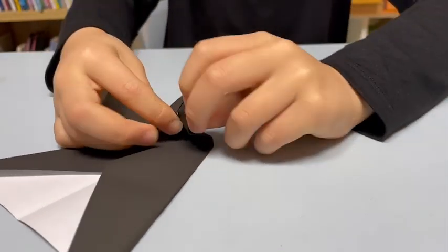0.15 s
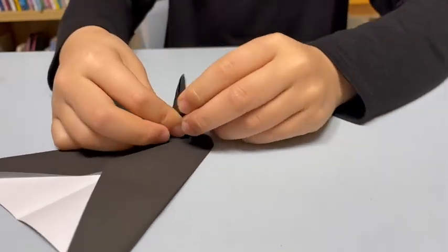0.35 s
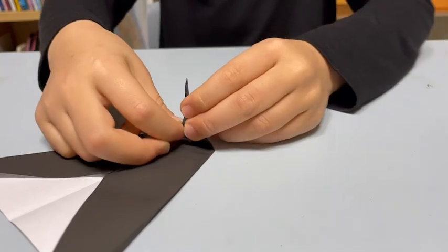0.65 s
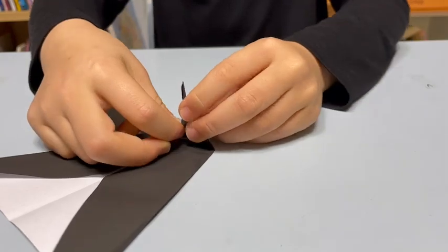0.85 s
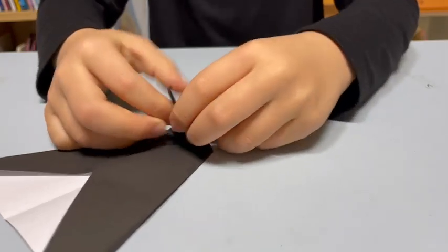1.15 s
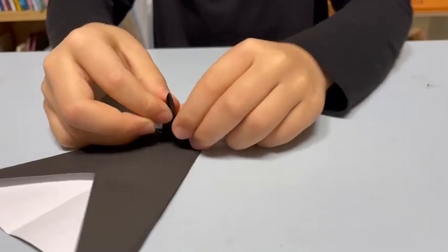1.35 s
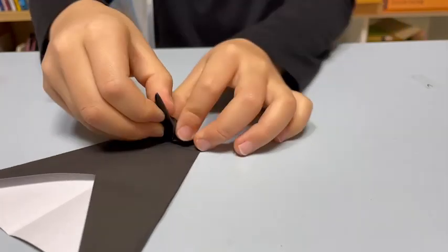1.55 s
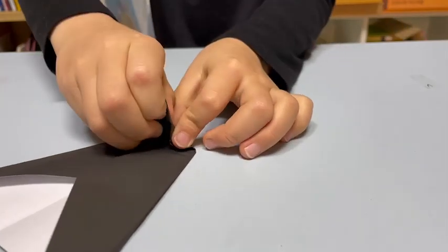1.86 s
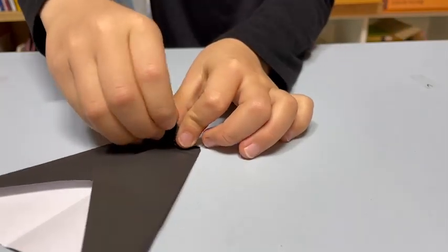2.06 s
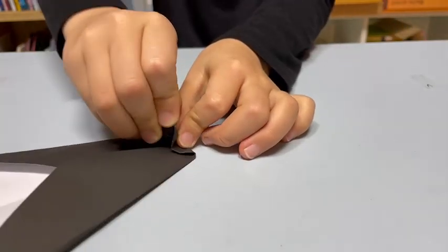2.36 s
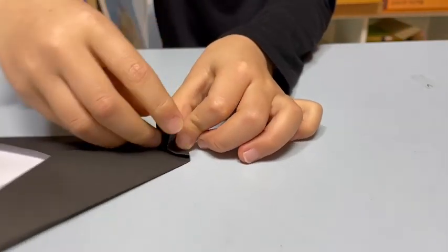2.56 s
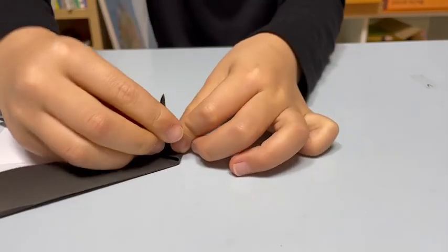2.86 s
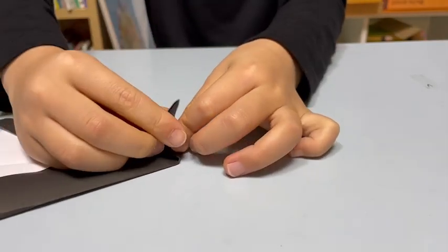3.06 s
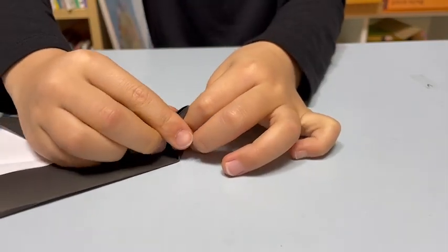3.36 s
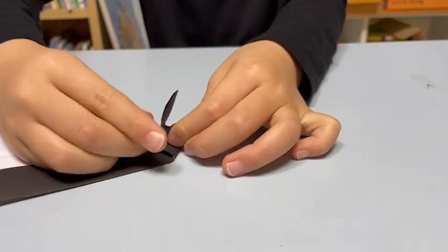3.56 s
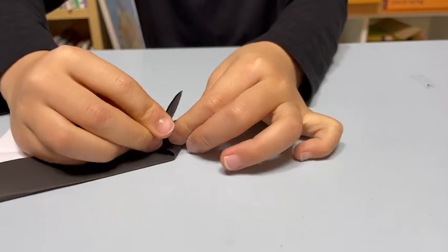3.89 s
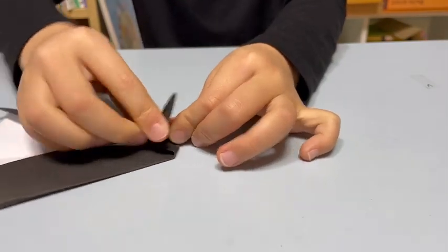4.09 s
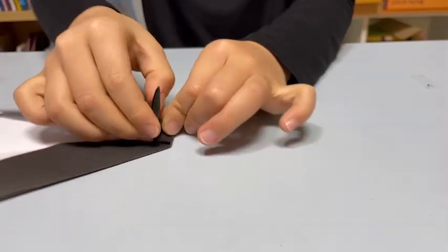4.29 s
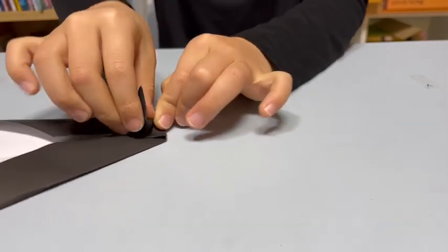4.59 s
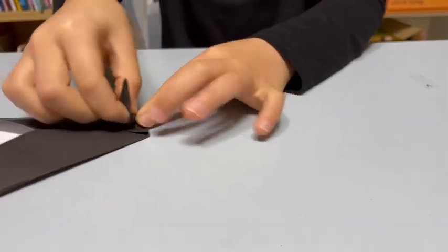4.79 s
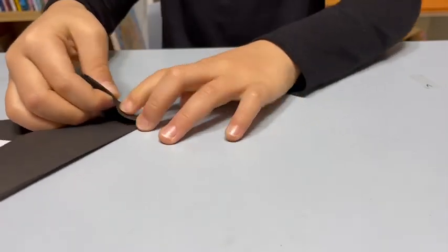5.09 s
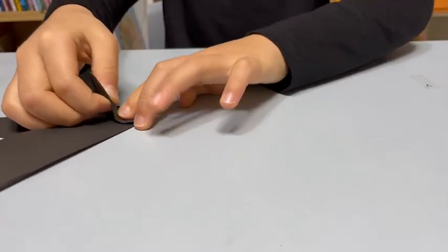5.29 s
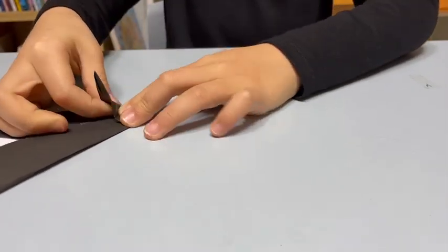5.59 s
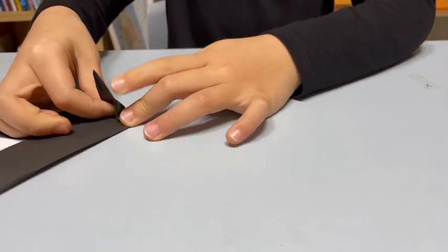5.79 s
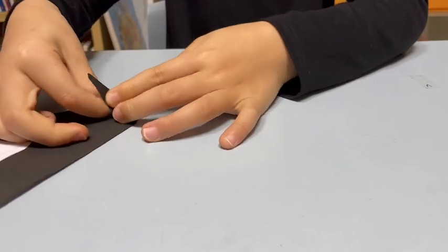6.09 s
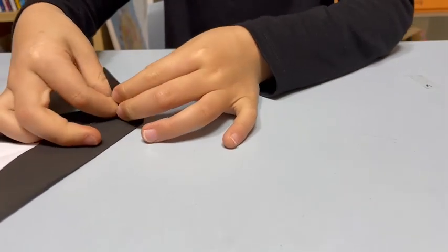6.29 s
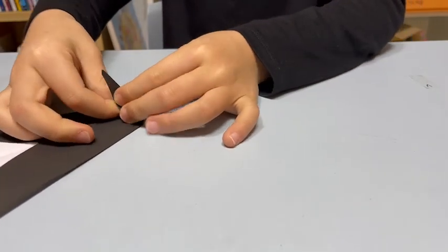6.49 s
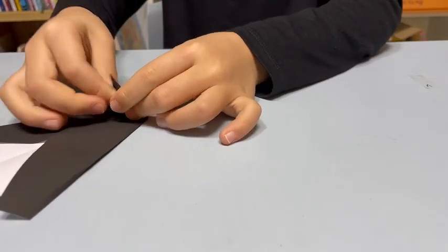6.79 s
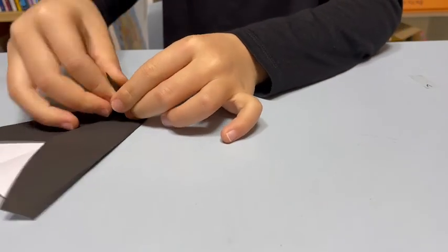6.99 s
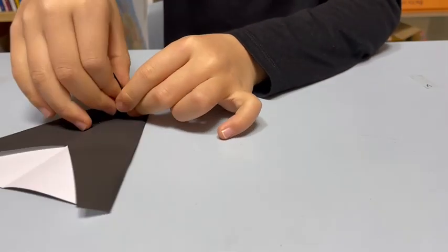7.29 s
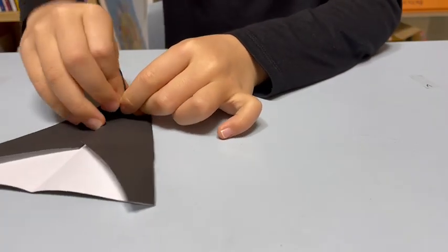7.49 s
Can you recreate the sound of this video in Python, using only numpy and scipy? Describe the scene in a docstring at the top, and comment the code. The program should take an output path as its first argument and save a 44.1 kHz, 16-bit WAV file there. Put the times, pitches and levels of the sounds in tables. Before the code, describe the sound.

Fingers fold and pinch stiff paper at close range, with dry snaps, tiny ticks and fine grainy rubbing in a quiet small room.

```python
"""Small room, at a table: fingers fold and pinch the tip of a stiff paper figure, close to a pair of microphone ports.
The paper buckles in short dry snaps and tick runs: an impulse and decaying noise, coloured facet by facet.
Skin and layers rub with a fine grainy hiss: noise roughened by tiny random slips, shaped by each stroke.
Hands pat the sheet and table (soft bands of noise) and slide with a breathy scrape (noise in a gliding resonance).
Sparse close echoes and a short tail follow, over a quiet low rumble and a faint wavering hum."""
import sys
import numpy as np
from scipy import signal
from scipy.fft import rfft, irfft
from scipy.io import wavfile
from scipy.ndimage import uniform_filter1d

SR = 44100
rng = np.random.default_rng(int(sys.argv[2]) if len(sys.argv) > 2 else 0)


def wrap_up_sound(samples):
    """Save the sound to the file named by the first command line argument, as 16-bit audio."""
    columns = np.atleast_2d(samples).T
    # keep every value between -1 and 1, then stretch to whole-number steps
    tamed = np.clip(columns, -1, 1)
    steps = np.round(tamed * 32767).astype(np.int16)
    wavfile.write(sys.argv[1], SR, steps)


N = 337365
TIME_S = np.arange(N) / SR

# Room noise, spectrum shape: pitch_hz, relative_level_db
ROOM_SPECTRUM = [(20, -17.5), (45, -2.5), (72, 4), (110, -4), (170, -6), (220, -3), (300, -9), (500, -11.5),
                 (900, -27), (1600, -23), (2400, -23), (7500, -42.5), (15500, -37)]
# Finger strokes along the paper: start_s, length_s, relative_friction_db, hiss_over_sheet_db
STROKES = [(0, 0.055, -52.5, -18), (0.379, 0.21, -58.5, 5.5), (0.884, 0.051, -60, 9),
           (0.949, 0.056, -61.5, 6.5), (1.08, 0.065, -60.5, 5.5), (1.148, 0.12, -53.5, 4.5),
           (1.321, 0.14, -53.5, 1), (1.468, 0.22, -60, 4), (1.78, 0.026, -52, -3), (1.916, 0.07, -58, 8),
           (2.208, 0.063, -47, 7.5), (2.475, 0.12, -51, 5), (2.591, 0.12, -52.5, 5.5),
           (2.89, 0.026, -59, -13), (2.962, 0.047, -62, 6), (3.156, 0.12, -59, 4.5),
           (3.375, 0.074, -63.5, 5), (3.455, 0.15, -55, 1.5), (4.055, 0.078, -58.5, 5),
           (4.142, 0.1, -54, 2), (4.25, 0.079, -54.5, 7), (4.38, 0.14, -57, 4), (4.512, 0.059, -57.5, 11.5),
           (4.625, 0.071, -64, 10.5), (4.706, 0.38, -59, 4), (5.047, 0.14, -54, 0.5),
           (5.296, 0.088, -59, 2), (5.448, .08, -50, 4.5), (5.536, 0.11, -58, -16), (5.708, 0.016, -46, 8),
           (5.847, 0.32, -59.5, 1.5), (6.129, 0.089, -56.5, 5), (6.205, 0.1, -67, 1),
           (6.333, 0.046, -67.5, 8.5), (6.456, 0.45, -66.5, 10), (6.625, 0.072, -53, 1),
           (6.78, 0.083, -59, 2), (6.89, 0.037, -73, 16.5), (7, 0.1, -70, 15.5), (7.12, 0.076, -65, 8),
           (7.213, 0.072, -65.5, 7.5), (7.346, 0.21, -56, 0.5)]
ATTACK_S, RELEASE_S, ARCH_DB = 0.016, 0.011, 4  # a stroke sets in, is fastest halfway, and dies away
HISS_GROWTH = 1.11  # exponent: hiss grows faster with speed than the sheet's body does
# Held paper creeping under the fingertips between strokes: time_s, relative_friction_db
CREEP = [(0, -62.5), (.6, -66), (.8, -72), (1.05, -78), (1.5, -67), (1.9, -63), (2.15, -69), (2.7, -61.5),
         (2.87, -75), (3.08, -66), (3.35, -69.5), (3.62, -62.5), (3.75, -75), (4.0, -64), (4.75, -64.5),
         (5.7, -76.5), (6.7, -72.5), (7.6, -67)]
CREEP_BRIGHT_DB = 1  # hiss over sheet while creeping
# What the rubbed sheet radiates, spectrum shape: pitch_hz, relative_level_db
SHEET_SPECTRUM = [(150, -2.5), (500, -0.5), (850, -8), (1250, -4.5), (1600, -5), (2200, 3), (3000, -1.5),
                  (3900, 2), (5000, 3), (6500, -6.5), (12000, -10.5)]
# Hiss of the fibres at the contact, spectrum shape: pitch_hz, relative_level_db
HISS_SPECTRUM = [(1500, -71), (4000, -61.5), (5700, 0.5), (6300, 8.5), (7300, 7), (9200, 2), (11000, -1.5),
                 (12500, -10), (13900, -14), (15200, -4.5), (16000, 4)]
# Paper facets buckling, before the hollow ring and echoes: start_s, strength_db (near 3 kHz), then relative to
# that low_db (near 1.2 kHz), high_db (near 7.2 kHz), top_db (near 15 kHz)
SNAPS = [(0.0004, -2, -2, 8.5, 10.5), (0.349, 3.5, -15, -10.5, -32), (0.3781, -13, -8.5, 9, -4),
         (0.4503, -17, -25, 7, 0), (0.5526, -6, -16, 10, 2.5), (0.72, -13.5, -6.5, -30, -29),
         (0.8644, -21, -4, 6, -10), (0.9675, -19.5, -20, -14, -3), (1.5635, -16, -27, -13, -5),
         (1.6551, -13.5, -15, 2, 2), (1.797, 1.5, -4.5, 9, -6.5), (1.8095, -15, 5, 6, -15),
         (1.9924, -11.5, -5.5, -8, -3), (2.198, -7, -20, -5, -19), (2.2312, -0.5, -12.5, -12, -9),
         (2.2759, 1.1, -1, 3, -8), (2.4756, -16, -8, -7, -5), (2.6274, -3, -2.5, 2, -19),
         (2.9684, -1, 1, 4, -15), (3.4032, -12.5, -12, 4.5, -17), (3.482, -7, -4, 5, -10),
         (3.5029, -15.5, -2.5, 8.5, 0), (4.2856, -3, 2, -7, -31), (4.4765, -3, -1.5, -1.5, -23),
         (4.875, -12, -4, -5.5, -38), (4.9583, -5, 1, 0.5, -28), (5.4355, -6, -5.5, 7.5, -8),
         (5.6119, -19.5, 10.5, 2, -42), (5.7284, -12, -28, 7, -18), (5.911, -18.5, 0, -9, -20),
         (5.95, -21, -1.5, 10, 0), (5.9725, -20, -1, 0, -2), (6.0006, -16, -8, 3, -17),
         (6.0388, -20, -6, 11, 9.5), (6.082, -17, -14, -1, -26), (6.6689, -20, 3, 13.5, 9),
         (6.788, -24, -20, 9, -15), (6.8195, -12.5, -12.5, -0.5, -1), (6.8605, -19, -26, -8, -9),
         (7.3848, -11, -15, 5, -14), (7.453, 9, -11, -1.5, -22), (7.634, -15, 3, 12.5, 6.5)]
RING_S, RING_DOUBLING_DB = 0.002037, 17.5  # decay at low_db 0; a larger facet has more bass, rings longer
# A crease giving way in a run of tiny ticks: start_s, length_s, mean_strength_db
CRACKLES = [(0.442, 0.13, -25), (5.322, .04, -24), (5.9, .16, -25), (6.741, .12, -25)]
TICKS_PER_S, TICK_SPREAD_DB = 31, 2.5
# Colour of one tick, relative to its strength: low_db, high_db, top_db as for the snaps
TICK_COLOUR = (-9, 6.2, -9)
STRAY_TICK_DB = 23  # mean tick strength above the friction level
# Soft pats on the sheet and the table: start_s, relative_level_db, centre_hz, rise_s
PATS = [(0.003, -46.5, 46, 0.041), (0.166, -54, 218, 0.013), (.275, -56, 940, 0.0043),
        (1.014, -56, 44.5, 0.016), (1.205, -59, 360, 0.0069), (1.257, -53.5, 43.8, 0.027),
        (1.58, -60, 44.7, .02), (1.807, -48.5, 220, 0.0053), (2.28, -58, 60, 0.029),
        (2.52, -61.5, 100, 0.041), (2.623, -36.5, 815, 0.0035), (4.358, -57.5, 706, 0.01),
        (4.872, -44.5, 600, 0.0051), (4.873, -53.5, 142, 0.022), (4.956, -49, 303, 0.0085),
        (5.463, -55.5, 159, 0.038), (5.795, -57.5, 890, 0.0049), (5.945, -53.5, 203, 0.022),
        (6.001, -47.5, 196, 0.015), (6.924, -61.5, 930, 0.0066), (7.025, -63, 830, 0.01)]
# Sheet and hand sliding over the table: start_s, end_s, relative_level_db, first_resonance_hz, last_resonance_hz
SLIDES = [(0.107, .37, -60.5, 2320, 2950), (5.173, 5.6, -66.5, 2750, 2750),
          (7.224, 7.69, -63.5, 2630, 2750)]
# Phase by which the left port leads the right: pitch_hz, lead_rad
LEAD = [(300, -.2), (1200, .6), (1550, 2.7), (2000, 1.3), (3200, .7), (4900, 1.1), (5800, 2.7), (6700, .9),
        (7300, 1), (7900, 3.1), (9000, 3.3), (9900, 6.28), (11400, 6.4), (11900, 9.4), (13400, 9.5),
        (14000, 12.56)]
# Level of the left port over the right, for fully alike sound: pitch_hz, left_minus_right_db
BALANCE = [(50, 0.5), (200, -4.5), (600, -4.5), (1400, 0), (1750, -3), (2600, 4.5), (5100, 6.5),
           (6100, -4.5), (7100, -3.5), (8300, 1.5)]
# Likeness of the two ports: pitch_hz, likeness (0 to 1)
LIKENESS = [(50, .95), (300, .68), (1000, .88), (5000, .9), (9000, .985)]
EDGE_HZ = 15800  # upper band limit of the recorder


def from_db(db):
    """Amplitude factor of a level in dB."""
    return 10 ** (np.asarray(db) / 20)


def unit_rms(x):
    """Brings each channel to rms 1."""
    return x / np.sqrt(np.mean(x ** 2, axis=-1, keepdims=True) + 1e-20)


def read(points, hz):
    """Joins (Hz, value) points by straight lines on a log-frequency axis."""
    point_hz, value = np.transpose(points)
    return np.interp(np.log(hz + 1), np.log(point_hz + 1), value)


def add(mix, start_s, sound):
    """Lays a sound into the mix at its time, cut off at the end."""
    part = mix[:, max(round(start_s * SR), 0):][:, :sound.shape[1]]
    part += sound[:, :part.shape[1]]


def colour(x, spectrum):
    """Filters x by a spectrum shape and brings it to rms 1."""
    gain = from_db(read(spectrum, np.fft.rfftfreq(N, 1 / SR)))
    return unit_rms(irfft(rfft(x) * gain, N))


def wander(rate_hz):
    """Slow random motion of rms 1, fading out above the given rate."""
    hz = np.fft.rfftfreq(N, 1 / SR)
    slow = rfft(rng.standard_normal(N)) / (1 + (hz / rate_hz) ** 2)
    return unit_rms(irfft(slow, N))


def resonate(x, hz, width_hz):
    """A resonance that can glide: shifts hz down to zero, smooths, and shifts back, with gain 1."""
    turn = np.exp(2j * np.pi * np.cumsum(hz * np.ones(x.shape[-1])) / SR)
    r = np.exp(-np.pi * width_hz / SR)
    smooth = signal.lfilter([1 - r], [1, -r], x / turn + 1e-18)
    return 2 * (turn * smooth).real


def room_noise(level_db=-65.0, hum_hz=220, hum_db=-76.0):
    """Low rumble of the building, with a faint hum that wavers in pitch and level."""
    phase = 2 * np.pi * np.cumsum(hum_hz + 4 * wander(8.06)) / SR
    hum = np.sin(phase) * (1 + 0.5 * wander(6.6))
    rumble = colour(rng.standard_normal((2, N)), ROOM_SPECTRUM)
    return from_db(level_db) * rumble + from_db(hum_db) * unit_rms(hum)


def friction():
    """Strength of the sheet's body and of the hiss: stroke power on top of the held paper's creep."""
    creep_db = np.interp(TIME_S, *np.transpose(CREEP))
    power = from_db([creep_db, creep_db + CREEP_BRIGHT_DB]) ** 2
    t = np.arange(SR // 2) / SR
    for start_s, length_s, level_db, bright_db in STROKES:
        progress = np.minimum(t / length_s, 1)
        arch = from_db(-ARCH_DB * (2 * progress - 1) ** 2)
        release = np.exp(-np.maximum(t - length_s, 0) / RELEASE_S)
        speed = np.minimum(t / ATTACK_S, 1) * arch * release
        body_and_hiss = np.array([speed, from_db(bright_db) * speed ** HISS_GROWTH])
        add(power, start_s, (from_db(level_db) * body_and_hiss) ** 2)
    return np.sqrt(power)


def drifting(x, patchy_db=2.5):
    """The contact point moves over the sheet, so the colour of the sound shifts in patches."""
    z = signal.stft(x, SR, nperseg=512)[2]
    patches = uniform_filter1d(rng.standard_normal(z.shape[1:]), size=7, axis=0)  # across pitch
    patches = uniform_filter1d(patches, size=12, axis=1)  # along time
    gain = from_db(patchy_db * patches / patches.std())
    return signal.istft(z * gain, SR, nperseg=512)[1][:, :N]


def rubbing(slips_per_s=1000, spread_db=4.0, slip_decay_s=0.0023, grain_db=-2, flutter_db=0.94, flutter_hz=60, sheet_db=1):
    """Fibres catch and let go in countless tiny slips, which hiss and shake the sheet."""
    body, hiss = friction()
    sizes = from_db(spread_db * np.minimum(rng.exponential(1, N), 5.5))
    sizes *= rng.random(N) < slips_per_s / SR
    # slips add in power, each dying away
    slip_power = signal.lfilter([1], [1, -np.exp(-1 / (slip_decay_s * SR))], sizes ** 2)
    grain = from_db(grain_db) * unit_rms(np.sqrt(slip_power))
    drive = unit_rms(rng.standard_normal((2, N)) * np.hypot(1, grain))
    grip = from_db(flutter_db * wander(flutter_hz))  # the finger's grip is never even
    sheet_sound = from_db(sheet_db) * body * colour(drive, SHEET_SPECTRUM)
    hiss_sound = hiss * colour(drive, HISS_SPECTRUM)
    return grip * drifting(sheet_sound + hiss_sound)


def causal(db):
    """Minimum-phase response with the given gains: no sound before the blow."""
    log_gain = np.log(from_db(np.maximum(db, -100)))
    circle = np.concatenate([log_gain, log_gain[-2:0:-1]])
    return np.exp(np.conj(signal.hilbert(circle)))[:len(db)]


def snap(level_db, low_db, high_db, top_db, ring_s, crack=2.56, creep_db=-8, creep_s=0.00051, size=2048, order=90):
    """A facet creeps, flips with one crack, and bending waves rebound in the sheet for a few milliseconds."""
    t = (np.arange(size) - order) / SR  # the crack falls at t = 0
    hz = np.fft.rfftfreq(size, 1 / SR)
    before = from_db(creep_db) * np.exp(-abs(t) / creep_s)
    after = np.exp(-abs(t) / max(ring_s, 1 / SR))
    waves = rng.standard_normal((2, size)) * np.where(t < 0, before, after)
    waves[0, order] += crack  # the crack is common to both ports
    z = rfft(waves)
    # the rebounds ripple the spectrum; the facet sets its broad shape
    broad_db = 10 * np.log10(uniform_filter1d(abs(z) ** 2, size=70, axis=1))
    shape = [(100, low_db - 16.0), (600, low_db - 9.5), (1200, low_db), (1600, low_db / 2 - 2),
             (2200, 0.015), (4500, 0), (5800, high_db - 2), (7200, high_db - 0.5),
             (10000, (high_db + top_db) / 2), (13200, top_db - 4.5), (15300, top_db)]
    responses = np.array([causal(read(shape, hz) - b) for b in broad_db])
    return t[0], from_db(level_db) * irfft(z * responses)


def ticks(size=24, count=50):
    """Tiny facets flip in turn while a crease gives way, and now and then under the rubbing fingers."""
    rows = []
    for start_s, length_s, strength_db in CRACKLES:
        times = (np.arange(size) + rng.random(size)) / TICKS_PER_S
        levels = strength_db + TICK_SPREAD_DB * rng.standard_normal(size)
        rows += [(start_s + s, level, *TICK_COLOUR) for s, level in zip(times, levels) if s < length_s]
    at = rng.integers(0, N, count)  # stray ticks, anywhere in the scene
    friction_db = 20 * np.log10(friction()[0, at])
    levels = friction_db + STRAY_TICK_DB + TICK_SPREAD_DB * rng.standard_normal(count)
    return rows + [(s, level, *TICK_COLOUR) for s, level in zip(TIME_S[at], levels)]


def buckling(body_hz=1270, body_width_hz=230, body_db=-5):
    """All the snaps and ticks of the folds; each leaves a brief hollow ring."""
    out = np.zeros((2, N))
    for start_s, level_db, low_db, high_db, top_db in SNAPS + ticks():
        ring_s = RING_S * 2 ** (low_db / RING_DOUBLING_DB)
        offset_s, sound = snap(level_db, low_db, high_db, top_db, ring_s)
        add(out, start_s + offset_s, sound)
    return out + from_db(body_db) * resonate(out, body_hz, body_width_hz)


def pats(gain_db=-2.5, spread=1.6):
    """Finger pads and the side of the hand land softly: dull thuds with no ring."""
    out = np.zeros((2, N))
    for start_s, level_db, centre_hz, rise_s in PATS:
        u = np.arange(int(8 * rise_s * SR)) / (rise_s * SR)  # time in units of the rise
        push = u * np.exp(1 - u)
        edges_hz = [centre_hz / spread, centre_hz * spread]
        band = signal.butter(2, edges_hz, "band", fs=SR, output="sos")
        noise = signal.sosfilt(band, rng.standard_normal((2, SR // 2)))[:, -len(u):]  # settled part
        thud = unit_rms(noise * push) * np.sqrt(np.mean(push ** 2))
        add(out, start_s, from_db(level_db + gain_db) * thud)
    return out


def sliding(width_hz=900, waver_db=-2.5):
    """A smooth, breathy scrape: noise in one broad resonance that moves with the stroke."""
    out = np.zeros((2, N))
    for start_s, end_s, level_db, first_hz, last_hz in SLIDES:
        noise = rng.standard_normal((2, SR))[:, :int((end_s - start_s) * SR)]
        hz = np.linspace(first_hz, last_hz, noise.shape[1])
        scrape = unit_rms(resonate(resonate(noise, hz, width_hz), hz, 2 * width_hz))
        fade = signal.windows.tukey(len(hz), 0.3)
        add(out, start_s, from_db(level_db) * scrape * fade)
    return out * from_db(waver_db * wander(18))


def room(x, t60_low_s=0.42, t60_high_s=0.21, early_db=7, early_s=0.0086, taps_per_s=4000):
    """Close echoes from hands and table, then the short tail of the room, dying sooner in the treble."""
    t = np.arange(SR // 2) / SR
    taps = rng.standard_normal((2, len(t)))
    taps *= (rng.random((2, len(t))) < taps_per_s / SR) * (t > 0.002)
    taps *= 1 + from_db(early_db) * np.exp(-t / early_s)
    hz, age_s, z = signal.stft(taps, SR, nperseg=256)
    t60_s = read([(1500, t60_low_s), (12000, t60_high_s)], hz)[:, None]
    decay = np.exp(-np.log(1000) * age_s / t60_s)  # 60 dB down after t60
    tail = signal.istft(z * decay, SR, nperseg=256)[1]
    tail /= np.linalg.norm(tail, axis=1, keepdims=True)
    return signal.fftconvolve(x, tail, axes=1)[:, :N]


def ports(pair):
    """A common and a stray version become left and right: alike, but apart in phase and level."""
    hz = np.fft.rfftfreq(N, 1 / SR)
    common, stray = rfft(pair)
    alike = np.clip(read(LIKENESS, hz), 0, 1)
    side = from_db(read(BALANCE, hz))
    blend = alike * common + np.sqrt(1 - alike ** 2) * stray
    right = blend * np.exp(-1j * read(LEAD, hz))
    even_power = np.sqrt(2 / (1 + side ** 2))
    return irfft(np.array([common * side, right]) * even_power, N)


def scene(snap_room_db=-13, rub_room_db=-15):
    """Paper and hands on the table, their echoes and the room's own noise, heard at the two ports."""
    snaps = buckling()
    handling = rubbing() + sliding() + pats()
    echoes = room(from_db(snap_room_db) * snaps + from_db(rub_room_db) * handling)
    return ports(snaps + handling + echoes + room_noise())


def record(dry):
    """The recorder's band limit: a steep linear-phase low-pass."""
    low_pass = signal.firwin(255, EDGE_HZ, window=("kaiser", 9), fs=SR)
    return signal.oaconvolve(dry, low_pass[None], "same", axes=1)


dry = scene()
out = record(dry)
wrap_up_sound(out)
```